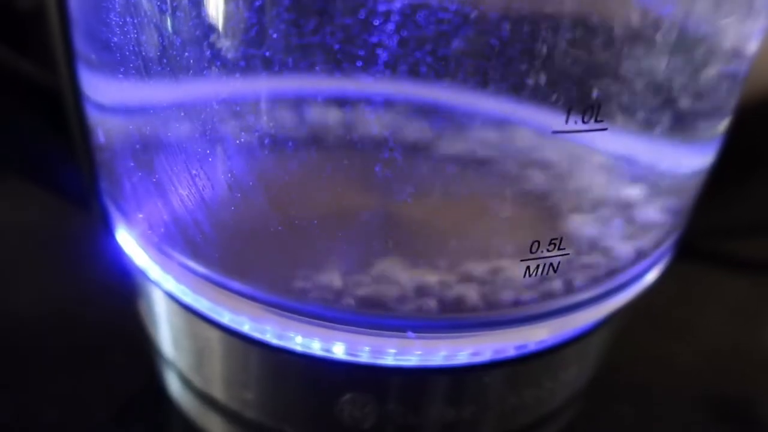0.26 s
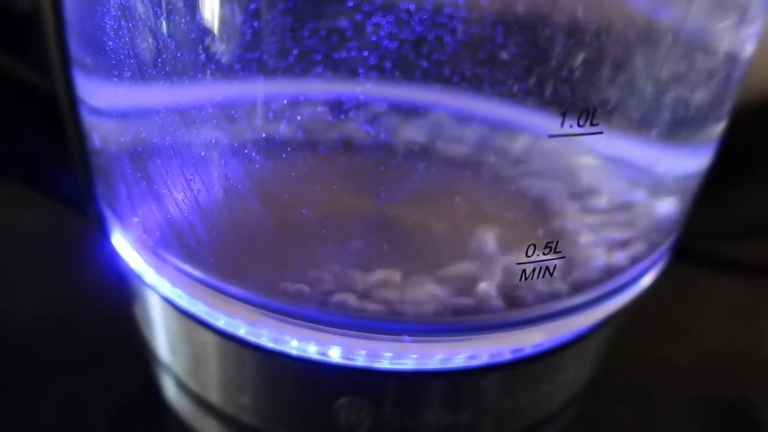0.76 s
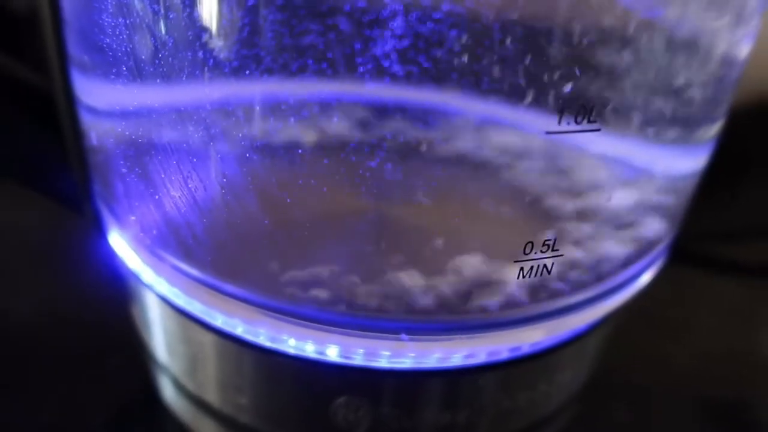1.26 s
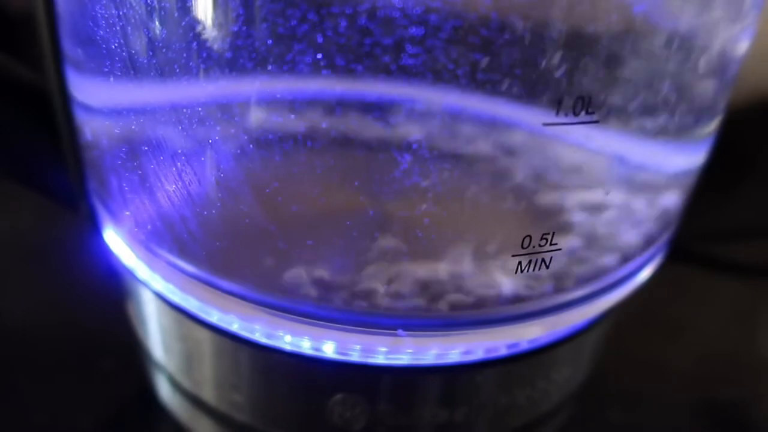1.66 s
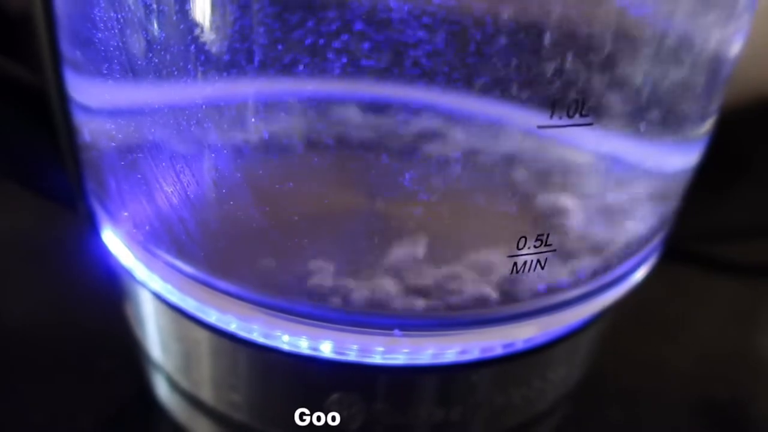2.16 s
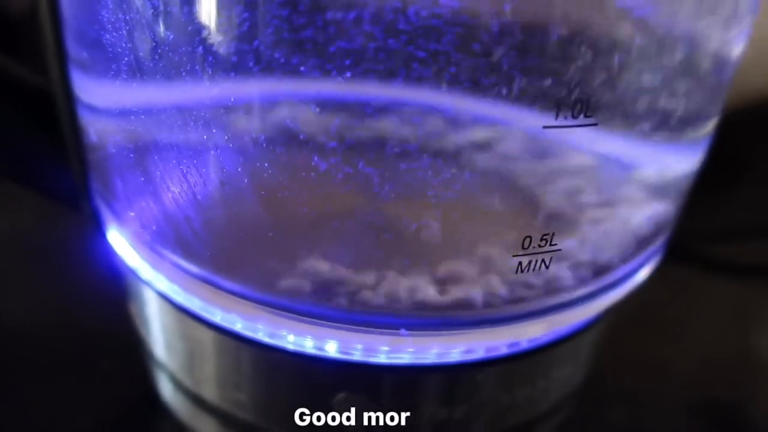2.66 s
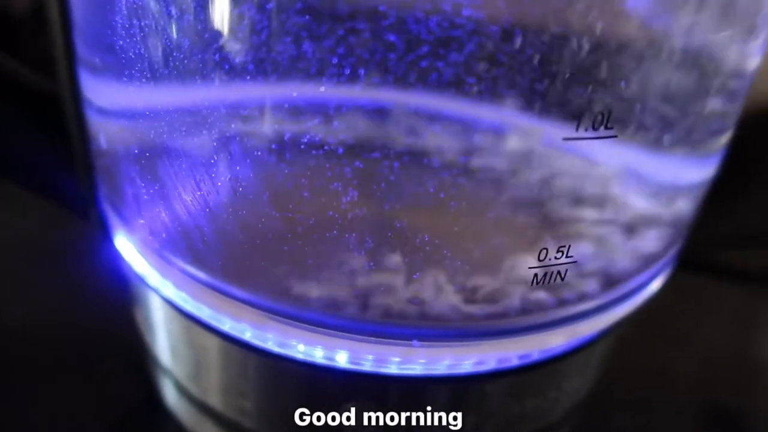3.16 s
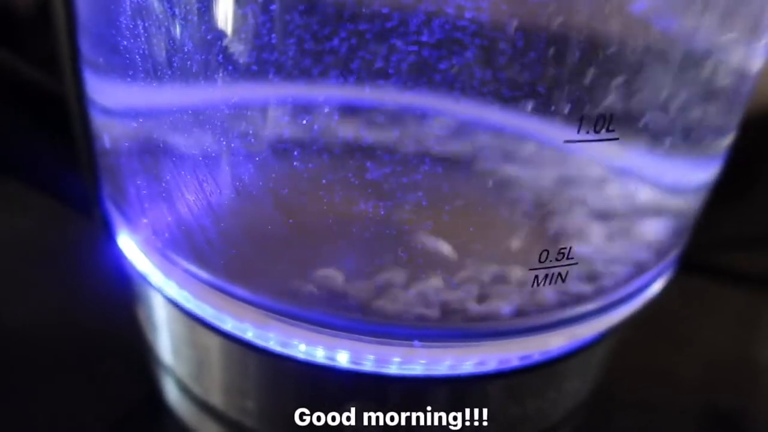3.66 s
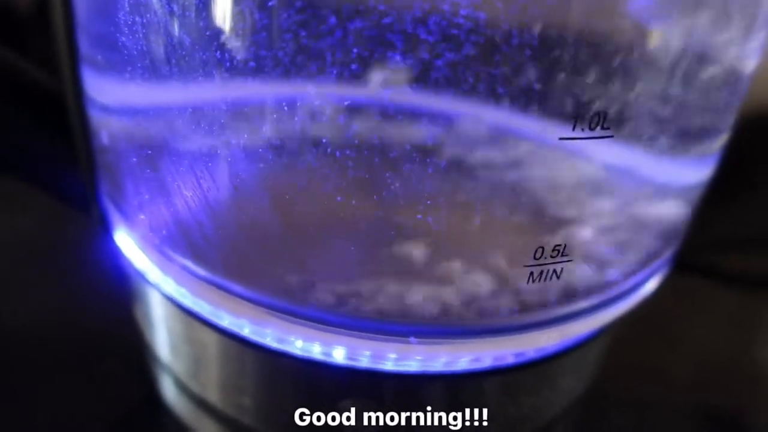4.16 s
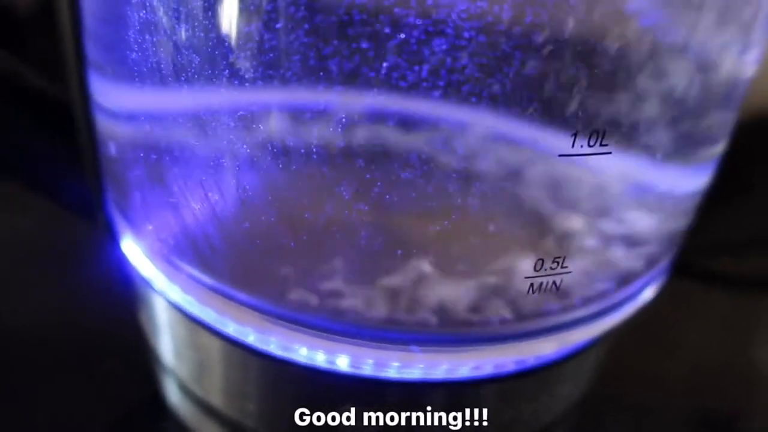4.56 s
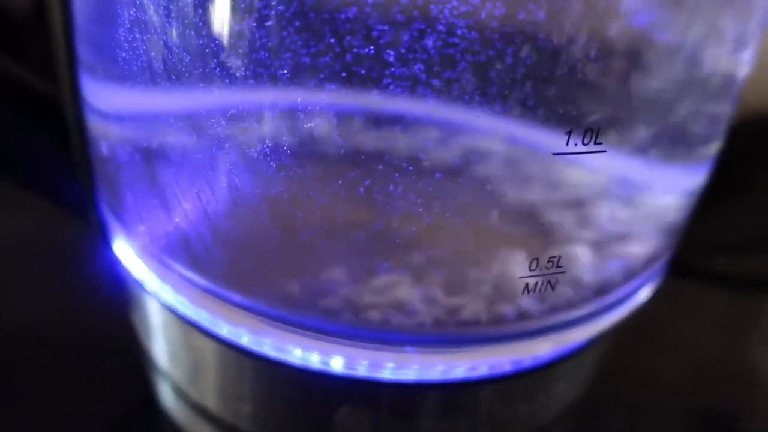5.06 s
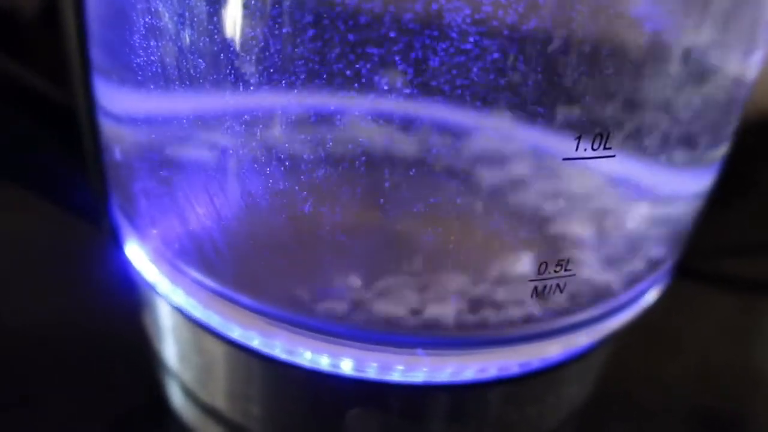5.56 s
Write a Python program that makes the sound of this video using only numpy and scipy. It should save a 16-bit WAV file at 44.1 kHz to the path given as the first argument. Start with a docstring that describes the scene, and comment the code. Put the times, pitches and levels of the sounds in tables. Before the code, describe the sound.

For nearly six seconds a glass kettle of water close to boiling is heard from near by in a kitchen. From 0 s a dense, dark rumble is fully present: countless steam bubbles collapsing at random, in small clumps, coloured by the ringing of jug, water and metal base. Under it a narrow low hum flutters in short uneven swells several times a second, some stronger around 2.7, 3.2 and 4.0 s. Short, soft, deep glugs surface irregularly, for instance near 0.4, 0.8, 1.1, 2.2, 2.8, 3.4, 4.1 and 5.7 s, half buried in the churn. Many tiny rising blips add a watery grain, and a very faint, fine fizz lies above. The low sound stays central while the fizz is wider. The level is nearly constant, sinking slightly after about 3.5 s; the boil continues right to the end, with no click or switch-off.

```python
"""On a kitchen worktop: a glass kettle close to the boil, picked up from near by through two microphone ports.
Steam bubbles grow on the hot steel floor and collapse in the cooler water: a dense hail of random blows,
in clumps, filtered by the modes of jug, water and base. Large bubbles glug on short bending notes, small ones
blip with climbing pitch. The base hums at a wavering low note, a narrow noise with uneven random swells."""
import sys
import numpy as np
from scipy import signal
from scipy.fft import rfft, irfft, next_fast_len
from scipy.io import wavfile
from scipy.ndimage import uniform_filter1d, map_coordinates

SR = 44100
rng = np.random.default_rng(int(sys.argv[2]) if len(sys.argv) > 2 else 0)


def to_wav(s):
    """Save 16-bit WAV."""
    ch = np.atleast_2d(s).T  # columns
    pcm = np.round(np.clip(ch, -1, 1) * 32767)  # PCM
    wavfile.write(sys.argv[1], SR, pcm.astype(np.int16))


N = 256220

# course of the boil, before RUMBLE_DB: time_s, rumble_level_db, fizz_level_db
BOIL_COURSE = [(0, -30.5, -52), (1.2, -30.5, -52.5), (2.4, -31, -53), (3.5, -30.5, -53),
               (4.6, -31.5, -53.5), (5.81, -32, -54)]
# what a collapse sends to the microphone between the modes: frequency_hz, relative_level_db
BODY_COLOUR = [(15, -47), (28, -36.5), (65, -25), (100, -15), (190, -17.5), (320, -17), (470, -26),
               (550, -28.5), (700, -32.5), (1050, -31), (1450, -40), (1950, -40), (2950, -41), (3550, -56),
               (5200, -62.5), (7000, -61.5), (7950, -63.5), (10800, -73), (12400, -73.5), (12800, -76),
               (15000, -91)]
# how far scattered sound sets the two ports apart: frequency_hz, side_gain_db
PORT_SPREAD = [(100, -75), (150, -62), (200, -33), (270, -33), (370, -20), (900, -21.5), (1600, -21.5),
               (2600, -25.5), (2900, -16), (3300, -13), (3650, -3.5), (5300, -2), (7300, -4), (9000, 0.5),
               (10500, 3.5), (14000, -2.5)]
# the jug stands a little to the right and reaches that port at another moment: frequency_hz, side_phase_rad
PORT_LAG = [(300, -2.5), (2500, -4.5), (3600, -2), (8000, -1.5)]
# modes of jug, water and base: pitch_hz
MODE_PITCHES = [45, 146, 256, 320, 385, 440, 505, 590, 625, 660, 775, 843, 882, 965, 1290, 1535, 1630, 1820,
                2078, 2430, 2610, 2880, 3285, 3880, 4020, 4165, 4290, 4525, 5635, 6080, 6270, 7340, 7480,
                7760, 9260, 9580]
# the same modes in order: width_hz, level_over_body_db
MODE_BELLS = [(11.9, 13), (24.7, 7.5), (47.7, 8.5), (22.2, 4.5), (34.4, 5.5), (35.2, 5.5), (30.6, 6),
              (40, 5), (40, 9), (40, 8), (60, 4.5), (33, 9.5), (37.4, 10.5), (55, 6), (99, 5.5), (70, 8),
              (121, 7), (110, 4), (90, 5), (60, 3.5), (90, 5.5), (120, 2.5), (60, 4.5), (80, 6), (90, 4),
              (125, 12), (119.7, 7), (70, 6), (60, 7), (130, 8), (220, 6.5), (190, 11), (160, 11),
              (240, 1.5), (150, 3.5), (340, 6)]
# chance level of the noise around 270 Hz, about its mean: time_s, relative_level_db
DEEP_NOISE_LEVEL = [(0.1, -29), (0.3, -30), (0.5, -28.5), (0.7, -30), (0.9, -31), (1.1, -27.5), (1.3, -29),
                    (1.5, -30.5), (1.7, -27.5), (1.9, -34.5), (2.1, -27.5), (2.3, -31), (2.5, -28),
                    (2.7, -35), (2.9, -27.5), (3.1, -32.0), (3.3, -28), (3.5, -29), (3.7, -30.5),
                    (3.9, -26), (4.1, -29.5), (4.3, -29), (4.5, -31), (4.7, -30.5), (4.9, -30.5),
                    (5.1, -28), (5.3, -26.5), (5.5, -30), (5.7, -24.5)]
# large bubbles that ring the water's deep note, before GLUG_DB: start_s, length_s, level_db, pitch_hz
GLUG_NOTES = [(0.285, 0.038, -28, 267), (0.412, 0.031, -21, 257.5), (0.821, 0.028, -23, 268),
              (0.98, 0.033, -28.5, 271), (1.029, 0.046, -28, 281.4), (1.146, 0.021, -22, 261),
              (1.607, 0.025, -28, 263), (1.648, 0.033, -30, 270), (1.765, 0.025, -28, 270),
              (2.237, 0.034, -23, 270), (2.703, 0.045, -25.5, 260), (2.789, 0.027, -21, 267),
              (3.434, 0.039, -24, 260), (3.854, 0.067, -29, 286.8), (4.052, 0.026, -24.5, 261),
              (4.25, 0.042, -24.5, 274), (5.458, 0.045, -25.5, 255.3), (5.719, 0.033, -23, 255.2)]
# loudest random swells of the narrow low hum, before CREST_DB: start_s, length_s, level_db, pitch_hz
HUM_SWELLS = [(0.051, 0.027, -23.5, 108), (0.08, 0.024, -27, 108.4), (0.168, 0.061, -21, 106.7),
              (0.295, 0.14, -23, 102.8), (0.452, 0.049, -20.5, 108.7), (0.619, 0.1, -20, 110.4),
              (0.719, 0.061, -23.1, 101.1), (0.947, 0.08, -20.5, 109.3), (1.056, 0.097, -22.5, 106.1),
              (1.256, 0.078, -25.5, 101.6), (1.337, 0.045, -27, 113.3), (1.412, 0.031, -27, 110.3),
              (1.453, 0.054, -32, 114.6), (1.608, 0.042, -24.5, 105.8), (1.655, 0.054, -21.5, 107.3),
              (1.746, 0.031, -24, 120), (1.802, 0.033, -25.5, 110.3), (1.842, 0.033, -26.1, 106.2),
              (1.989, 0.031, -22, 116.1), (2.015, 0.04, -24, 106.1), (2.097, 0.07, -23.2, 106.8),
              (2.164, 0.035, -24, 109.7), (2.199, 0.086, -23, 106.2), (2.329, 0.031, -24, 111),
              (2.435, 0.091, -20, 105.7), (2.528, 0.031, -22, 107.9), (2.584, 0.055, -24.5, 104.4),
              (2.712, 0.044, -17, 107.9), (2.832, 0.029, -23, 101.7), (2.873, 0.06, -23, 107.9),
              (2.964, 0.033, -27, 106.8), (3.026, 0.03, -26, 99.8), (3.082, 0.059, -21, 107.7),
              (3.157, 0.043, -17.5, 108.5), (3.31, 0.055, -24.5, 102.5), (3.441, 0.1, -21, 108.5),
              (3.643, 0.07, -19.5, 110.7), (3.769, 0.061, -21, 107.6), (3.967, 0.045, -16, 110.3),
              (4.02, 0.047, -21.6, 104.8), (4.124, 0.034, -22, 112.1), (4.162, 0.076, -20.5, 105.5),
              (4.259, 0.04, -25, 115.2), (4.342, 0.073, -20, 105.2), (4.432, 0.041, -19.5, 103.7),
              (4.577, 0.05, -20.5, 109.6), (4.669, 0.04, -24, 107.9), (4.718, 0.029, -22, 100.3),
              (4.75, 0.068, -23.5, 107.2), (4.828, 0.076, -21, 107.4), (4.93, 0.041, -20.5, 110.6),
              (5.107, 0.066, -25, 108), (5.184, 0.1, -22, 107), (5.335, 0.07, -20.5, 108.3),
              (5.418, 0.164, -20.5, 107.8), (5.648, 0.17, -23, 105.3)]

SPLIT_HZ, RUMBLE_DB = 3300, 4  # rumble below, fizz above; lift of the whole rumble
DRIFT_DB = 0.67  # strength of the slow patches as bubbles move over the floor
DEEP_HZ, DEEP_WIDTH_HZ, DEEP_DB = 270, 92, -1.0  # deep noise band; its mean gain
CHURN_HZ, CHURN_WIDTH_HZ, CHURN_DB = 372, 140, 3  # water churned by a large bubble: band and lift
GLUG_DB, GLUG_EDGE_S, GLUG_BEND_HZ_PER_S = -1.5, 0.023, 130  # level offset, edges, pitch bend
GLUG_COVER = 0.37  # share of the deep noise's amplitude a glug replaces
HUM_HZ, FLUTTER_HZ = 105.7, 1.59  # base on the worktop; quick drift of its note
MURMUR_DB, MURMUR_WIDTH_HZ = -31.5, 14.3  # the same resonance between the swells
RISE_S, FALL_S, SAG_HZ_PER_S = 0.0301, 0.045, 16.88  # edges of a swell; how fast its note sinks
CREST_DB, UNEVEN_DB, DOME_DB = -0.5, 0.56, 1.5  # level offset; unevenness; ends of the top under its middle
TURN_CYCLES = 0.3  # step in phase from each swell to the next, to and fro
BLIP_COUNT, BLIP_DB = 500, -41  # small free bubbles; level of all together
BLIP_HZ, BLIP_LOG_SPREAD = 800.6, 0.35  # middle starting pitch and its spread
BLIP_CYCLES, BLIP_RISE = 16.07, 0.1497  # life in cycles; share the pitch climbs in one life
TOP_HZ = 15140  # band limit of the recorder


def boil():
    """Bubbles come in clumps: the rumble follows them more than the fine fizz does."""
    rumble_db, fizz_db = curves(BOIL_COURSE)
    clump_db = 0.25 * wobble(18) + 0.4 * wobble(40) + 0.45 * wobble(110)
    low = lambda hz: 1 / np.sqrt(1 + (hz / SPLIT_HZ) ** 16)
    high = lambda hz: np.sqrt(1 - low(hz) ** 2)
    large = amp(0.78 * clump_db) * collapses(1500, spread_db=2.0, wash=1.42)
    small = amp(0.7 * clump_db) * collapses(2500, spread_db=2.6, wash=1.4)
    large = patchy(large, patchy_db=0.74)
    small = patchy(small, patchy_db=1.3)
    rumble = amp(rumble_db + RUMBLE_DB) * through_jug(large, low, room_ring=0.14)
    fizz = amp(fizz_db) * through_jug(small, high, room_ring=0.3)
    return with_glugs(rumble) + fizz


def collapses(per_second, spread_db, wash):
    """Random blows of uneven size, on the wash of those too dense to tell apart; rows: mid, side."""
    happens = rng.random(N) < per_second / SR
    size = happens * amp(spread_db * np.minimum(rng.exponential(size=N), 4))
    blows = unit(size * rng.standard_normal((2, N)))
    return blows + wash * rng.standard_normal((2, N))


def patchy(x, patchy_db):
    """Each spot of the steel floor has its own colour: random gain in quick and slow patches of pitch and time."""
    z = signal.stft(x, nperseg=256)[2]

    def field(bins, frames):
        noise = rng.standard_normal(z.shape[1:])
        across_pitch = uniform_filter1d(noise, bins, 0)
        return unit(uniform_filter1d(across_pitch, frames, 1))

    gain = amp(patchy_db * field(5, 6) + DRIFT_DB * field(2, 40))
    return signal.istft(z * gain, nperseg=256)[1][:, :N]


def jug(hz, ring=1):
    """Gain of the vessel: each mode lifts the body's power in a bell around its pitch."""
    lift = 0
    for centre, (width, db) in zip(MODE_PITCHES, MODE_BELLS):
        lift = lift + (amp(db) ** 2 - 1) * bell(hz, centre, width, 2) ** 2
    return amp(along(BODY_COLOUR, hz)) * np.sqrt(np.clip(1 + ring * lift, 1e-3, None))


def through_jug(blows, band, room_ring):
    """Ring the vessel; the ports differ by scattered sound, which rings less, and by a slanted arrival."""
    spread = lambda hz: amp(along(PORT_SPREAD, hz))
    mid = filtered(blows[0], lambda hz: jug(hz) * band(hz), causal=True)
    scattered = filtered(blows[1], lambda hz: jug(hz, room_ring) * band(hz) * spread(hz), causal=True)
    slanted = filtered(mid, lambda hz: 0.14 * spread(hz) * np.exp(1j * along(PORT_LAG, hz)))
    side = scattered + slanted
    level = np.std(filtered(mid, lambda hz: hz > 200))  # the lowest part does not set the level
    return np.array([mid + side, mid - side]) / level


def with_glugs(rumble):
    """The deep noise band varies by chance; a glug takes over part of it and churns the band above."""
    deep_db, = curves(DEEP_NOISE_LEVEL)
    notes, filled = glugs()
    deep = filtered(rumble, lambda hz: bell(hz, DEEP_HZ, DEEP_WIDTH_HZ, 4))
    deep_gain = amp(deep_db - deep_db.mean() + DEEP_DB) * (1 - GLUG_COVER * filled)
    churn = filtered(rumble, lambda hz: bell(hz, CHURN_HZ, CHURN_WIDTH_HZ, 4))
    churn_gain = amp(CHURN_DB * (filled - filled.mean()))
    return rumble + (deep_gain - 1) * deep + (churn_gain - 1) * churn + notes


def glugs():
    """Each large bubble sounds a short bending note; also how much each moment is filled by one."""
    notes, filled = np.zeros(N), np.zeros(N)
    for start_s, length_s, db, hz in GLUG_NOTES:
        near, u = moments(start_s, length_s, GLUG_EDGE_S, GLUG_EDGE_S)
        shape = rise_and_fall(u, length_s, GLUG_EDGE_S, GLUG_EDGE_S)
        cycles = (hz + GLUG_BEND_HZ_PER_S * (u - length_s) / 2) * u + rng.random()
        notes[near] += np.sqrt(2) * amp(db + GLUG_DB) * shape * np.sin(2 * np.pi * cycles)
        filled[near] = np.maximum(filled[near], shape)
    return notes, filled


def hum():
    """One narrow resonance kept ringing by the boil: a random murmur that gives way to its loudest swells."""
    swing, filled, note_hz = np.zeros(N, complex), np.zeros(N), np.full(N, float(HUM_HZ))
    for k, (start_s, length_s, db, hz) in enumerate(HUM_SWELLS):
        near, u = moments(start_s, length_s, RISE_S, FALL_S)
        shape = rise_and_fall(u, length_s, RISE_S, FALL_S)
        dome = amp(db - DOME_DB * (2 * u / length_s - 1) ** 2 * shape)
        swing[near] += dome * shape * np.exp(1j * np.pi * TURN_CYCLES * (-1) ** k)
        # of two overlapping swells, the one nearer its full height sets the note
        note_hz[near] = np.where(shape > filled[near], hz - SAG_HZ_PER_S * u, note_hz[near])
        filled[near] = np.maximum(filled[near], shape)
    cycles = np.cumsum(note_hz + FLUTTER_HZ * wobble(34)) / SR + rng.random()
    swells = np.sqrt(2) * np.imag(swing * np.exp(2j * np.pi * cycles))
    noise = filtered(rng.standard_normal(N), lambda hz: bell(hz, HUM_HZ, MURMUR_WIDTH_HZ, 2))
    murmur = amp(MURMUR_DB) * unit(noise)
    return amp(CREST_DB + UNEVEN_DB * wobble(30)) * swells + (1 - filled) * murmur


def blips():
    """Small bubbles ring briefly, their pitch climbing as they rise; lower ones tend to be louder."""
    when, size = rng.random((2, BLIP_COUNT, 1))
    hz = BLIP_HZ * np.exp(BLIP_LOG_SPREAD * rng.standard_normal((BLIP_COUNT, 1)))
    step = np.arange(SR // 10)
    age = step / SR * hz / BLIP_CYCLES  # in lives
    cycles = BLIP_CYCLES * age * (1 + BLIP_RISE * age / 2)
    tone = age * np.exp(-2 * age) * np.sin(2 * np.pi * cycles)
    loudness = amp(7.4 * size) * BLIP_HZ / hz
    where = (when * N).astype(int) + step
    together = np.bincount(where.ravel(), (loudness * tone).ravel())[:N]
    return amp(BLIP_DB) * unit(np.pad(together, (0, N - len(together))))


def amp(db):
    """Decibels to gain."""
    return 10 ** (np.asarray(db) / 20)


def unit(x):
    """Scale to rms 1."""
    return x / np.sqrt(np.mean(x ** 2) + 1e-20)


def bell(hz, centre_hz, width_hz, power):
    """Resonance curve, one half at the edges of its width; a higher power is flatter on top."""
    return 1 / (1 + (2 * (hz - centre_hz) / width_hz) ** power)


def along(points, hz):
    """Read (frequency, value) points on a log frequency axis."""
    f, v = np.transpose(points)
    return np.interp(np.log(hz + 1), np.log(f + 1), v)


def curves(rows):
    """One value per sample for each column after the time."""
    s, *cols = np.transpose(rows)
    return [np.interp(np.arange(N) / SR, s, c) for c in cols]


def wobble(rate):
    """A smooth random curve, rate knots a second."""
    knots = rng.standard_normal(int(N * rate / SR) + 4)
    return map_coordinates(knots, [np.arange(N) * rate / SR])


def moments(start_s, length_s, before_s, after_s):
    """The samples around a note or swell, and their time in seconds from its start."""
    near = slice(max(round((start_s - before_s) * SR), 0), round((start_s + length_s + after_s) * SR))
    return near, np.arange(N)[near] / SR - start_s


def rise_and_fall(u, length_s, rise_s, fall_s):
    """Smooth envelope, its edges centred on the start and the end."""
    edge = np.minimum(u / rise_s, (length_s - u) / fall_s)
    return np.sin(np.pi / 2 * np.clip(edge + 0.5, 0, 1)) ** 2


def filtered(x, gain, causal=False):
    """x through a gain of frequency; causal (minimum phase) = nothing sounds before the blow."""
    m = 2 * next_fast_len(N // 2 + SR // 2)
    response = gain(np.fft.rfftfreq(m, 1 / SR))
    if causal:
        cepstrum = irfft(np.log(response + 1e-9), m)
        cepstrum[1:m // 2] *= 2
        cepstrum[m // 2 + 1:] = 0
        response = np.exp(rfft(cepstrum))
    return irfft(rfft(x, m) * response, m)[..., :N]


def scene():
    """The boil across both ports, with the hum and the small bubbles in the middle."""
    return boil() + hum() + blips()


def record(dry):
    """The recorder keeps nothing above its band limit."""
    return filtered(dry, lambda hz: hz < TOP_HZ)


dry = scene()
out = record(dry)
to_wav(out)
```